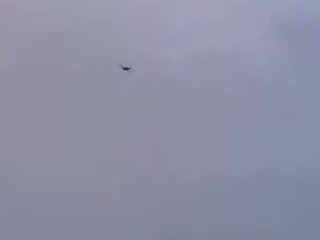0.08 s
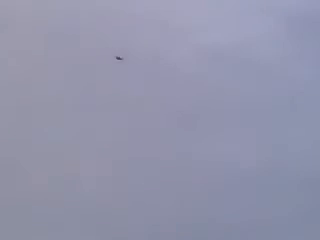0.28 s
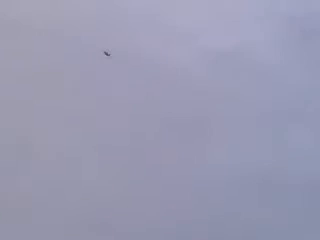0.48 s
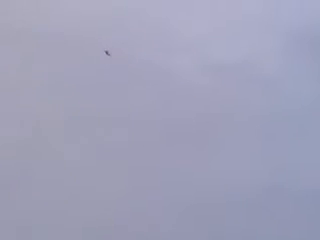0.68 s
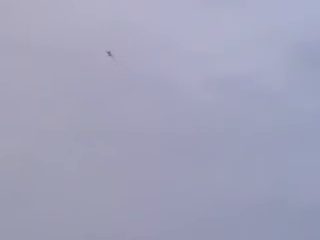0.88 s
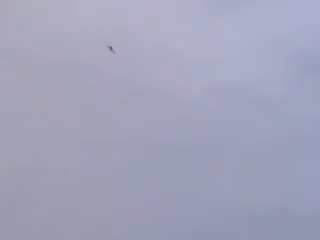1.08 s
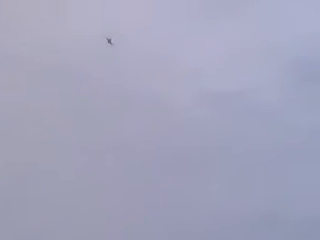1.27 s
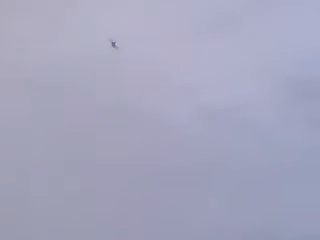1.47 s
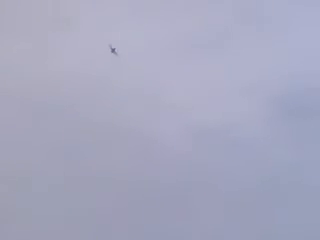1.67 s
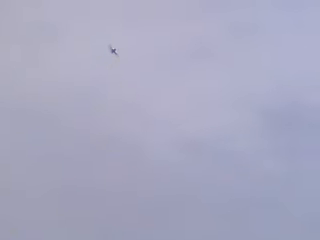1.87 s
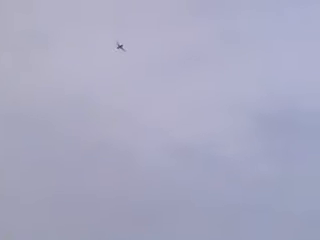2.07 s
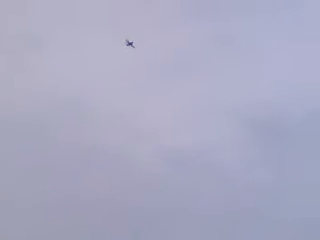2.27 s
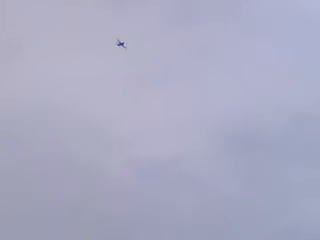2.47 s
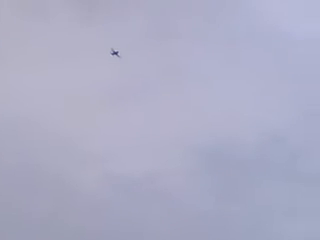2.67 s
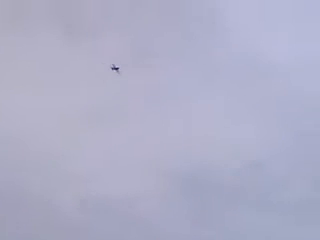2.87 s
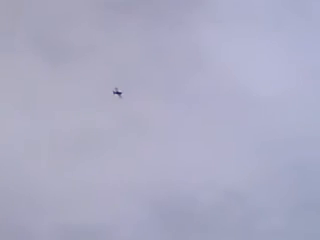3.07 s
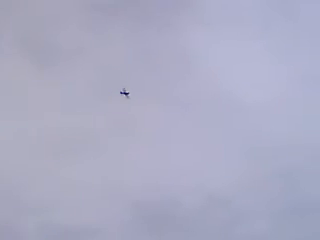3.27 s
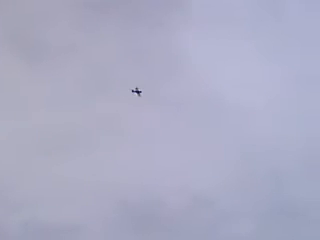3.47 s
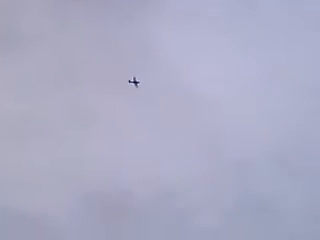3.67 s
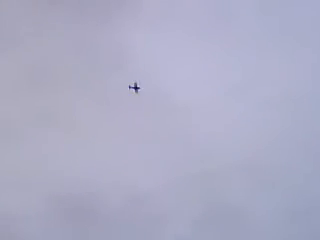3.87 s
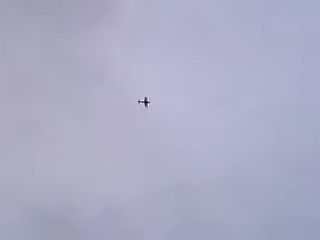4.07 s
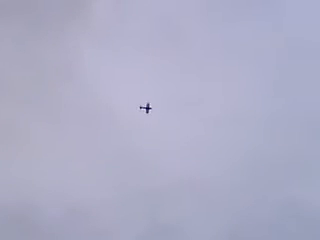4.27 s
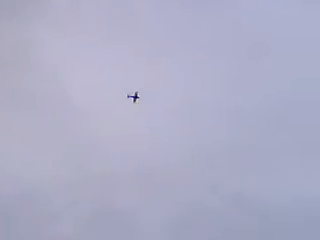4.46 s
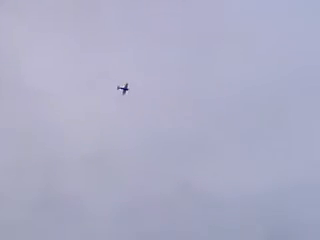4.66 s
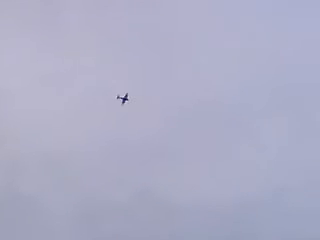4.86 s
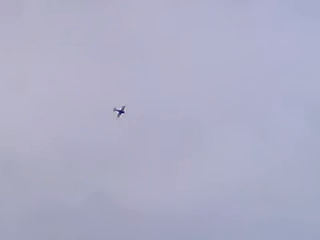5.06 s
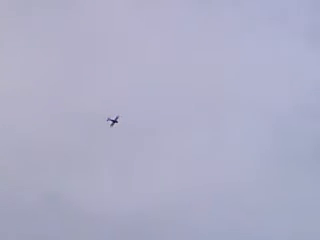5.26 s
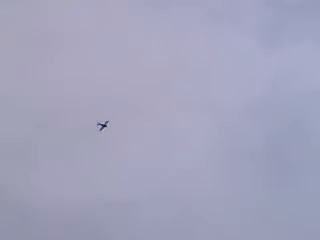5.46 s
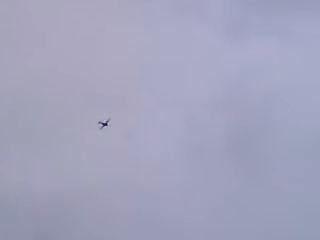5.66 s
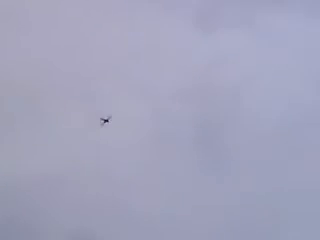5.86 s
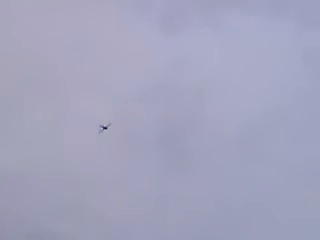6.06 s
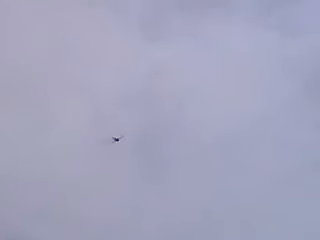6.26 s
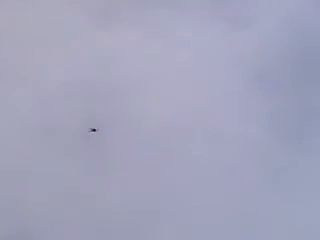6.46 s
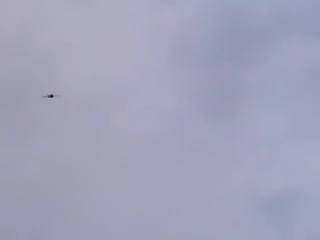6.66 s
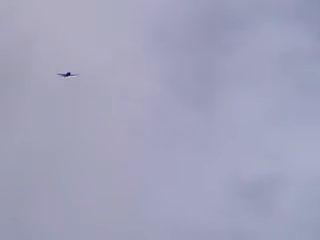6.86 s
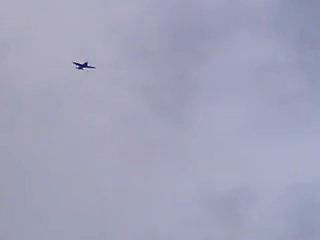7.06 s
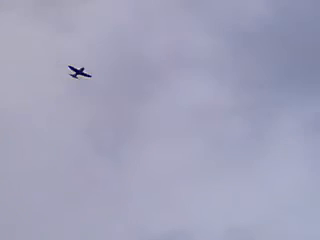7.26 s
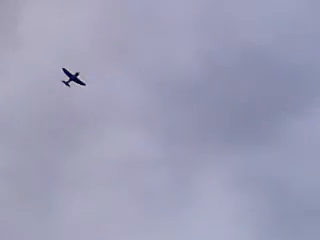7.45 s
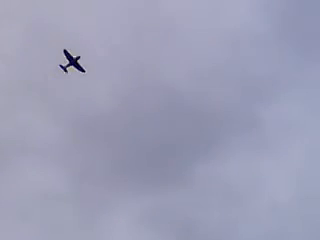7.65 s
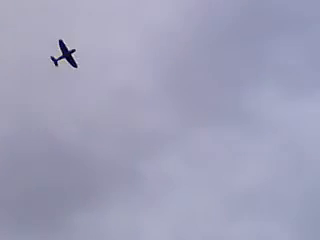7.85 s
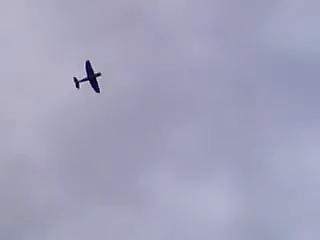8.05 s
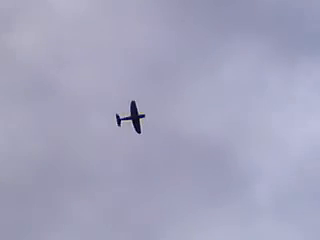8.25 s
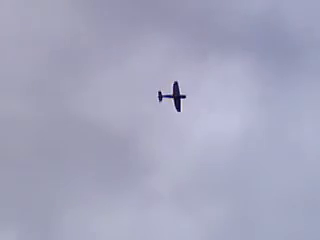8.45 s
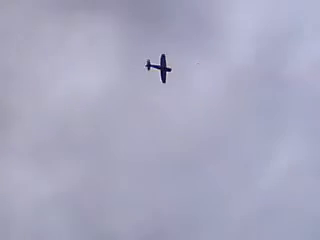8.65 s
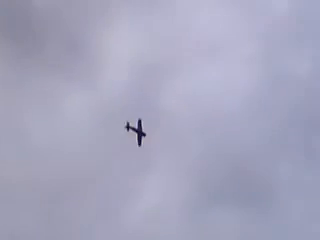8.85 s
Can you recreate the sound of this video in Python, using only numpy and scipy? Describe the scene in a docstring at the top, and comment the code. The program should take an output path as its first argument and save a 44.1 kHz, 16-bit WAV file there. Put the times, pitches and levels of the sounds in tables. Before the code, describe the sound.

Wind rumbles on the microphone outdoors while a petrol model plane drones away, fades, then returns with a raspy, whining buzz overhead.

```python
"""Model aeroplane fly-by

A single-cylinder two-stroke flies away, loops far off, dives back and passes overhead. Its exhaust
cracks once a turn, rings in the silencer and puffs out hissing gas. The buzz arrives twice, straight
and off the ground, so a comb slides through the harmonics; moving air makes them flutter and trees add
a faint tail. Gusts buffet the microphone over a distant outdoor rush."""
import sys
import numpy as np
from scipy import signal
from scipy.fft import rfft, irfft, next_fast_len
from scipy.io import wavfile
from scipy.ndimage import map_coordinates

SR = 44100
rng = np.random.default_rng(int(sys.argv[2]) if len(sys.argv) > 2 else 0)


def unload_wav(signal):
    """Save mono or channel-first audio to the path in sys.argv[1] as 16-bit WAV at rate SR, clipped to [-1, 1]."""
    wavfile.write(
        sys.argv[1],
        SR,
        np.round(np.clip(np.atleast_2d(signal).T, -1, 1) * 32767).astype(np.int16),
    )


N = 392931

TOP_HZ = 7050  # upper edge of the mix
# The engine's note, Doppler shift included. Each row: time in seconds, firing rate in Hz.
FIRING_RATE = [(0.0, 136.1), (1.39, 131.5), (2.18, 129.3), (2.48, 127.7), (2.58, 128.3), (3.47, 127.3),
               (3.62, 126.4), (3.87, 127.7), (4.02, 127.8), (4.69, 132.2), (4.89, 131.2), (5.26, 133.6),
               (5.66, 139.0), (5.86, 143.2), (6.16, 146.9), (6.6, 154.3), (7.3, 161.7), (7.47, 162.9),
               (7.99, 157.7), (8.39, 150.9), (8.49, 148.3), (8.91, 140.5)]
# The plane's heading. Each row: time in seconds, position from 0 (away) through 1 (in) to 2 (overhead).
HEADING = [(3.7, 0), (5.2, 1), (7.3, 1), (8.2, 2)]


def amp(db):
    """Decibels to gain."""
    return 10 ** (np.asarray(db) / 20)


def unit(x):
    """x at rms 1."""
    return x / np.sqrt(np.mean(x ** 2) + 1e-20)


def along(points, hz):
    """Rows of frequency and value, read at hz on a log axis."""
    freqs, values = np.transpose(points)
    return np.interp(np.log(hz + 1), np.log(freqs + 1), values)


def curves(rows, t):
    """Each column after the time, read at the times t."""
    times, *columns = np.transpose(rows)
    return [np.interp(t, times, column) for column in columns]


def wobble(rate, t):
    """A smooth random curve with rate knots a second."""
    return map_coordinates(rng.standard_normal(4096), [t * rate], mode="wrap")


def filtered(x, response):
    """x shaped by a gain that depends on frequency."""
    size = next_fast_len(N + SR // 2)
    return irfft(rfft(x, size) * response(np.fft.rfftfreq(size, 1 / SR)), size)[:N]


def noise(spectrum):
    """Noise of rms 1, coloured by rows of frequency in Hz and relative level in dB."""
    return unit(filtered(rng.standard_normal(N), lambda hz: amp(along(spectrum, hz))))


def engine(t, flutter_db, fading_db, jitter_turns, scatter_db):
    """One exhaust crack a turn, no two alike, summed from its orders. Returns buzz and turn count."""
    slow = t[::SR // 100]
    turns = np.cumsum(curves(FIRING_RATE, t)[0]) / SR
    turns += jitter_turns * (wobble(130, t) + wobble(22, t))
    crank_angle = (2 * np.pi * (turns % 1)).astype(np.float32)
    levels = order_levels(slow)
    # resonances ring on after each crack (minimum phase); echoes in the silencer scatter the phases
    log_gain = np.log(amp(levels))
    phases = -signal.hilbert(np.r_[log_gain, log_gain[::-1]], axis=0).imag[:len(levels)]
    phases += rng.uniform(-1.1, 1.1, (len(levels), 1))
    # moving air makes the whole top swell and fade, most as the plane flies in
    surge_db = np.interp(curves(HEADING, slow)[0], [0, 1], [.7, 1.0]) * wobble(14, slow)
    buzz = np.zeros(N)
    for order, (level, phase) in enumerate(zip(levels, phases), 1):
        # turbulence shakes each order's level and phase, short waves most
        shake_db = surge_db + flutter_db * wobble(14, slow) + fading_db * wobble(2.904, slow)
        shake_db *= np.sqrt(order / len(levels))
        bend = (order / 42) ** 2 * wobble(26, slow)
        paths = ground_echo(order, slow)
        gain = np.interp(t, slow, amp(level + shake_db) * np.abs(paths))
        shift = np.interp(t, slow, phase + np.angle(paths) + bend).astype(np.float32)
        buzz += gain * np.cos(order * crank_angle + shift)
    return np.sqrt(2) * buzz * amp(scatter_db * wobble(140, t)), turns


def order_levels(t, count=52, air_loss=.22, near_fizz_db=-45):
    """Each engine order in dB: drone, rasp or fizz, coloured by the heading and the silencer."""
    # The low end, moving with range and heading. Each row: time in seconds, drone in dB, propeller in dB.
    low_end = [(0.0, -52.5, -30.5), (0.8, -57, -33.5), (1.4, -64, -36), (2.3, -63, -45), (3.2, -55, -50),
               (3.9, -54, -40), (4.6, -55.5, -42), (5.5, -51, -39.5), (6.4, -46, -37), (7.1, -42.5, -44.5),
               (7.6, -40.5, -38.5), (8.05, -36.5, -25.5), (8.3, -40, -38.5), (8.6, -44.5, -34),
               (8.91, -46, -42.5)]
    # The firing note throbs as the plane comes head-on. Each row: time in seconds, lift in dB.
    throb = [(6.9, 0), (7.2, 8), (7.5, 6), (8, 0)]
    # The engine's third harmonic, swelling and dipping as the plane moves.
    # Each row: time in seconds, level in dB.
    third_harmonic = [(0.0, -51), (2.3, -59.5), (3.0, -50), (3.8, -42.5), (4.9, -45), (5.45, -49.5),
                      (5.65, -59.5), (5.9, -42), (6.4, -37.5), (7.0, -42), (7.8, -41.5), (8.25, -52),
                      (8.6, -41), (8.91, -57)]
    # The exhaust's colour. Each row: gain in dB flying away, flying in and overhead.
    exhaust_colour = [(-3, 5.5, 5), (-2, 1.5, 4), (-4.5, 1.5, 5), (3.5, 1.5, 2.5), (-2, -0.5, -3),
                      (8, -1, .5), (2, -2, -10), (0, 4.5, 1), (-2, -2, -6.5), (0.5, -14, 1), (-7.5, -10, 1),
                      (-6.5, 1, 3), (2, -2, -1), (-6, -1, -2.5), (-0.5, -1, 3), (-0.5, -1.5, 1.5),
                      (4, 4.5, 4), (-5, -2.5, 0.5), (3, 3.5, 3.5), (2, 1.5, -9), (-16, -3, 1),
                      (3, 0.5, -0.5), (0.5, -8, -7)]
    # The engine order that each of those rows belongs to.
    colour_orders = [1, 2, 3, 4, 5, 6, 7, 8, 10, 12, 13, 15, 16, 18, 20, 22, 25, 27, 29, 32, 34, 39, 44]
    drone_order, rasp_order, fizz_order = 9, 16, 28
    orders = np.arange(1, count + 1)
    drone, propeller = curves(low_end, t)
    rasp, fizz = treble(t)
    crossfades = [np.interp(orders, [drone_order, rasp_order, fizz_order], row) for row in np.eye(3)]
    levels = np.transpose(crossfades) @ [drone, rasp, fizz]
    # far away, the air takes still more from the orders above the fizz
    levels += air_loss * np.outer(np.maximum(orders / fizz_order - 1, 0), fizz - near_fizz_db)
    levels[0] += curves(throb, t)[0]
    levels[1] = propeller  # second order
    levels[2] = curves(third_harmonic, t)[0]
    heading, = curves(HEADING, t)
    by_heading = [np.interp(orders, colour_orders, column) for column in np.transpose(exhaust_colour)]
    colour = [np.interp(heading, [0, 1, 2], row) for row in np.transpose(by_heading)]
    return levels + colour + resonances(orders, t)


def treble(t, rasp_share=.8):
    """Rasp and fizz in dB: the high orders, which the air absorbs with range."""
    # The top of the buzz. Each row: time in seconds, rasp in dB, fizz in dB.
    top_end = [(0.0, -35, -60), (0.2, -42.5, -63.5), (0.45, -41.5, -61.5), (0.72, -38.5, -60),
               (0.93, -41.5, -63), (1.08, -49, -68), (1.45, -50, -67), (2.2, -61.5, -78.5), (2.9, -64, -73),
               (3.6, -52, -68.5), (4.05, -61.5, -72), (4.5, -53.5, -74), (4.9, -47.5, -71),
               (5.4, -59, -69.5), (5.55, -56.5, -66.5), (6.0, -52, -68.5), (6.25, -48.5, -65),
               (7.0, -50.5, -68), (7.3, -48.5, -62), (7.6, -43.5, -55.5), (8.1, -38, -57.5),
               (8.4, -38, -55.5), (8.91, -40.5, -57.5)]
    # Short flares where it leaps out. Each row: peak time in seconds, length in seconds, lift in dB.
    flares = [(4.8, .07, 6.5), (5.0, .1, 5), (5.25, .08, 6), (5.86, .1, 7), (6.27, .1, 3.5),
              (6.47, .1, 4.4), (6.8, .09, 3.5), (7.46, .08, 2.5), (7.62, .09, 2), (7.86, .12, 3.5),
              (8.31, .1, 4.5), (8.48, .09, 1.5), (8.73, .09, 1.5), (8.89, .09, 4)]
    rasp, fizz = curves(top_end, t)
    flare = sum(db * np.exp(-(2 * (t - peak) / length) ** 2) for peak, length, db in flares)
    return rasp + rasp_share * flare, fizz + flare


def resonances(orders, t, narrow_hz=55, broad_hz=130, waver_depth=.3):
    """Boost or cut in dB of the orders near each resonance; the higher the ring, the more it wavers."""
    # In all six tables, each row: time in seconds, centre in Hz, boost in dB.
    # Two lower resonances that stand out, or cancel, only at some angles of the plane.
    hoot = [(4.45, 524.0, 3.5), (5.05, 526.0, 10.0), (5.7, 560.0, 1.0), (6.3, 743.0, 3.5),
            (6.6, 770.0, 0.5), (7.1, 804.0, 6.0), (7.6, 1138.0, 10.5), (7.8, 1114.0, 4.0),
            (8.0, 944.0, 1.0), (8.3, 914.0, 6.5), (8.91, 846.0, 5.0)]
    howl = [(6.4, 1400, 0), (6.7, 1400, -11), (7.17, 1443, -9), (7.3, 1455, 2), (7.48, 1466, 8),
            (7.6, 1620, 9), (8.05, 1569, 7.5), (8.27, 1530, 16), (8.55, 1472, 6), (8.91, 1400, 6.5)]
    # Three rings of the silencer, moving with the Doppler shift and the plane's angle.
    whine = [(0, 2042, 1), (.35, 2025, 5), (.8, 2002, 2), (.95, 1993, 7), (1.8, 1955, 10), (2.1, 1950, 2),
             (2.5, 2180, 7), (2.7, 2178, 17), (2.9, 2174, 19.5), (3.4, 2165, 14), (3.62, 2149, 15.5),
             (3.8, 2165, 14), (4.05, 2174, 17), (4.12, 2056, 12), (4.35, 2080, 7), (4.7, 2115, 2),
             (4.95, 2106, 6), (5.2, 2130, 18), (5.58, 2208, 18), (5.87, 2297, 8), (6.5, 2330, 7),
             (6.9, 2360, 7), (7.0, 2222, 12), (7.25, 2254, 17), (7.38, 2272, 12), (7.52, 2435, 11),
             (7.68, 2410, 6), (7.85, 2228, 5), (8.1, 2179, 7), (8.5, 2204, 1), (8.85, 1985, 9)]
    zing = [(.2, 4096, 4), (.42, 4060, 14), (.85, 4070, 13), (1.0, 4060, 9), (1.15, 4080, 13),
            (1.4, 4054, 13), (2.3, 3950, 3), (4.85, 4350, 0), (5.0, 4350, 7), (5.25, 4270, 6),
            (5.4, 3950, 3), (5.58, 3990, 10), (5.75, 4080, 2), (5.87, 4160, 7), (6.0, 4400, 2),
            (6.1, 4480, 12), (6.27, 4580, 10), (6.42, 4600, 0), (7.2, 4660, 2), (7.35, 4700, 11),
            (7.47, 4660, 10), (7.62, 4650, 15), (7.75, 4555, 15), (7.87, 4560, 13), (8.0, 4530, 12),
            (8.17, 4440, 8), (8.32, 4315, 18), (8.5, 4225, 13), (8.62, 4170, 9), (8.75, 4110, 11),
            (8.91, 4060, 11)]
    shrill = [(0, 5035, 15), (.12, 5022, 16), (.28, 5002, 21), (.45, 4981, 14), (.65, 4956, 8),
              (2, 4835, 0), (7.2, 5850, 0), (7.7, 5780, 8), (7.9, 5710, 9), (8.3, 5480, 6), (8.6, 5265, 5),
              (8.91, 5060, 8)]
    # A broad resonance that gives the rasp its bite at some angles.
    bite = [(0, 2850, 5), (.75, 2900, 5), (1.1, 2850, 0), (5.3, 3000, 0), (5.55, 3040, 7), (5.72, 3030, 5),
            (5.85, 3060, 12), (6.05, 3100, 1), (6.27, 3130, 3), (6.45, 3150, 5), (6.7, 3150, 0),
            (7.3, 4000, -2), (7.55, 4000, 7), (7.87, 3750, 4), (8.1, 3500, -3), (8.3, 3450, 7),
            (8.45, 3400, 0)]
    order_hz = np.outer(orders, curves(FIRING_RATE, t)[0])
    total_db = 0
    for half_width_hz, rings in (narrow_hz, [hoot, howl, whine, shrill]), (broad_hz, [bite, zing]):
        for ring in rings:
            centre_hz, boost_db = curves(ring, t)
            waver = 1 + waver_depth * centre_hz / TOP_HZ * wobble(18, t)
            detune = (order_hz - centre_hz) / half_width_hz
            total_db += waver * boost_db / (1 + detune ** 2)
    return total_db


def ground_echo(order, t, reflection=.85):
    """Complex gain of an order: the straight path plus a late, duller copy off the grass."""
    # The bounce comes later when the plane is higher, and stays bright only at a grazing angle.
    # Each row: time in seconds, lag in seconds, cut-off in Hz.
    bounce = [(0.0, 0.00337, 3382.0), (1.5, 0.00358, 3259.0), (2.0, 0.00416, 1383.0),
              (3.0, 0.00463, 1551.0), (4.0, 0.00459, 1552.0), (4.8, 0.00546, 1464.0),
              (5.35, 0.0051, 1493.0), (5.8, 0.00396, 1735.0), (7.35, 0.00401, 1964.0),
              (7.8, 0.00457, 1722.0), (8.3, 0.00537, 1522.0), (8.91, 0.00568, 1562.0)]
    lag, cutoff_hz = curves(bounce, t)
    hz = order * curves(FIRING_RATE, t)[0]
    return 1 + reflection / (1 + (hz / cutoff_hz) ** 4) * np.exp(-2j * np.pi * hz * lag)


def exhaust_gas(t, turns, low_db, high_db, pulse_depth):
    """Each firing blows a puff of turbulent gas, which hisses between the harmonics."""
    # The hiss is strongest in the head-on dive. Each row: time in seconds, low and high lift in dB.
    hiss_lift = [(1, -2, -2), (5.5, -1, -1.5), (6.4, 2, 0), (7.1, 1.5, 0), (7.5, 0, 2), (7.95, 0, 3),
                 (8.2, -2, -2)]
    rasp, fizz = treble(t)
    low_lift, high_lift = curves(hiss_lift, t)
    puffs = unit(np.exp(pulse_depth * np.cos(2 * np.pi * turns)))
    low = noise([(300, -13.5), (900, -19), (1600, -2), (2200, 4), (2800, -6.5), (4000, -39)])
    high = noise([(1800, -23.5), (3000, -11), (4300, -12), (5000, -17.5), (6800, -27)])
    return puffs * (amp(rasp + low_db + low_lift) * low + amp(fizz + high_db + high_lift) * high)


def trees(x):
    """The field and its trees scatter a tail, each frequency dying at its own speed."""
    # The tail's length. Each row: frequency in Hz, seconds to fall by 60 dB.
    decay_times = [(150, 0.09), (1500, 0.64), (7000, 0.3)]
    hz, t, spectrum = signal.stft(rng.standard_normal(SR // 2), SR, nperseg=256)
    decay = amp(-60 * t / along(decay_times, hz)[:, None])
    tail = signal.istft(spectrum * decay, SR, nperseg=256)[1]
    return signal.fftconvolve(x, tail / np.linalg.norm(tail))[:N]


def wind(t, lumps_db, flap_db, flap_steepness):
    """Gusts ride on the breeze; their eddies thump on the microphone, and harder ones reach higher up."""
    # The breeze between gusts. Each row: time in seconds, level in dB.
    breeze = [(0, -30.5), (1, -26.5), (1.35, -35.5), (3.2, -33), (3.8, -25), (4.9, -32.5), (6.15, -35.5),
              (6.55, -26), (7.25, -30), (7.9, -26), (8.91, -23.5)]
    # The gusts. Each row: peak time in seconds, length in seconds, level in dB.
    gusts = [(0.142, 0.16, -23), (0.587, 0.085, -22), (0.75, 0.036, -21), (0.799, 0.027, -20),
             (0.852, 0.044, -24), (0.899, 0.02, -23.5), (1.095, 0.13, -22.5), (1.778, 0.081, -23),
             (1.892, 0.067, -29), (2.129, 0.061, -28.5), (3.584, 0.06, -27), (3.87, 0.073, -27),
             (6.431, 0.093, -21.5), (6.632, 0.074, -22.5), (6.743, 0.081, -23.5), (7.008, 0.087, -23),
             (7.092, 0.035, -21), (7.387, .04, -26), (7.864, 0.14, -23.5), (8.203, 0.042, -20.5),
             (8.499, 0.035, -24), (8.416, 0.052, -28.5), (8.629, 0.29, -25), (8.899, 0.041, -20.5)]
    # A deep rumble and a brighter flap. Each row: frequency in Hz, relative level in dB.
    rumble_colour = [(10, -15), (25, -5), (45, 0), (70, -0.5), (110, -3.5), (170, -10.5), (300, -23),
                     (500, -31), (1000, -57), (3000, -75)]
    flap_colour = [(40, -29), (100, 0.5), (170, 3.5), (300, -2.5), (450, -9.5), (700, -18), (1500, -40.5),
                   (6000, -64)]
    slow = t[::SR // 200]
    power = amp(curves(breeze, slow)[0]) ** 2
    for peak, length, db in gusts:
        power += amp(db) ** 2 * np.exp(-(2 * (slow - peak) / length) ** 2)
    buffet = np.interp(t, slow, np.sqrt(power))
    lumps = unit(amp(lumps_db * wobble(30, t)))
    flap = amp(flap_db) * unit(buffet ** flap_steepness) * noise(flap_colour)
    rumble = buffet * noise(rumble_colour)
    return lumps * (rumble + flap)


def distant_rush(t, waver_db):
    """The steady hush of open country, with one brief, hoarse swell."""
    # Fader moves for hush and swell. Each row: time in seconds, level in dB.
    hush_level = [(0, -38.5), (1.4, -39.5), (2.6, -37), (5.55, -37.5), (6.3, -35.5)]
    swell_level = [(5.5, -52), (5.58, -39), (5.7, -32.5), (5.82, -33), (5.92, -40), (6.03, -40), (6.2, -66)]
    # Their tone. Each row: frequency in Hz, relative level in dB.
    hush_colour = [(450, -12), (650, -7), (850, -2.5), (1100, 0.5), (1400, -6), (1900, -7.5), (2400, -16),
                   (3200, -25), (4200, -22.5), (5000, -27.5), (6800, -34)]
    swell_colour = [(500, -31.5), (900, -5.5), (1250, 2), (1450, -4.5), (1800, -19.5), (3000, -44)]
    hush = amp(curves(hush_level, t)[0] + waver_db * wobble(7.5, t)) * noise(hush_colour)
    swell = amp(curves(swell_level, t)[0]) * noise(swell_colour)
    return hush + swell


def scene():
    """The plane and its faint tail in the trees, over a bed of wind and distant rush, in mono."""
    t = np.arange(N) / SR
    buzz, turns = engine(t, flutter_db=3.2, fading_db=2.8, jitter_turns=.0014, scatter_db=.7)
    plane = buzz + exhaust_gas(t, turns, low_db=-3.5, high_db=13.5, pulse_depth=.8)
    tail = amp(-17) * trees(plane)
    bed = wind(t, lumps_db=2.1, flap_db=-31.5, flap_steepness=2.19) + distant_rush(t, waver_db=.3)
    return (plane + tail + bed)[None]


def record(dry):
    """A brick-wall low-pass takes off everything above TOP_HZ."""
    return filtered(dry[0], lambda hz: 1 / np.sqrt(1 + (hz / TOP_HZ) ** 120))[None]


dry = scene()
out = record(dry)
unload_wav(out)
```